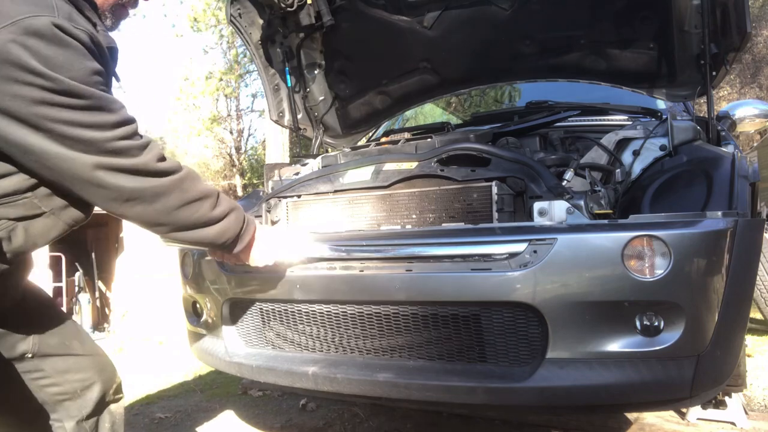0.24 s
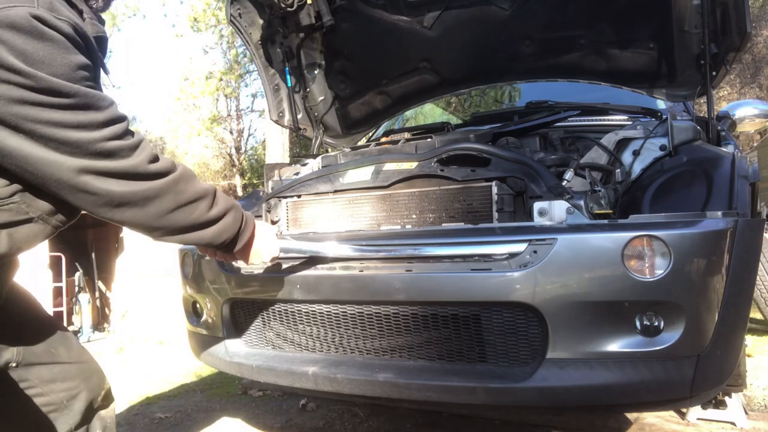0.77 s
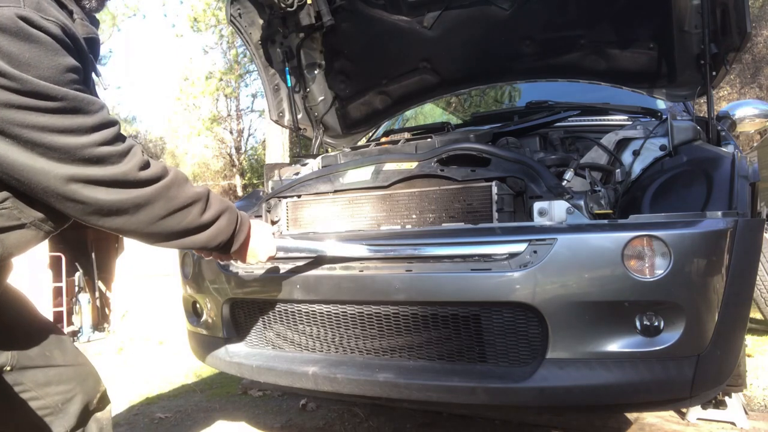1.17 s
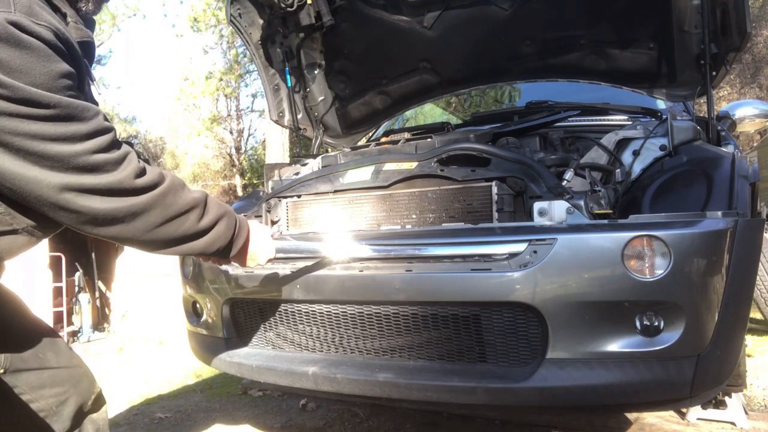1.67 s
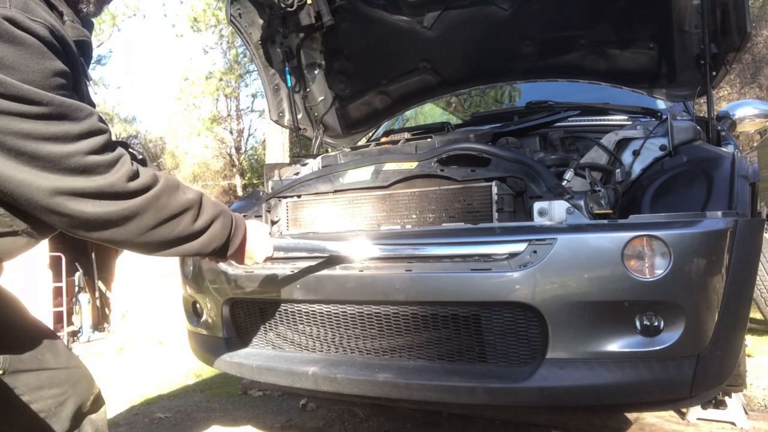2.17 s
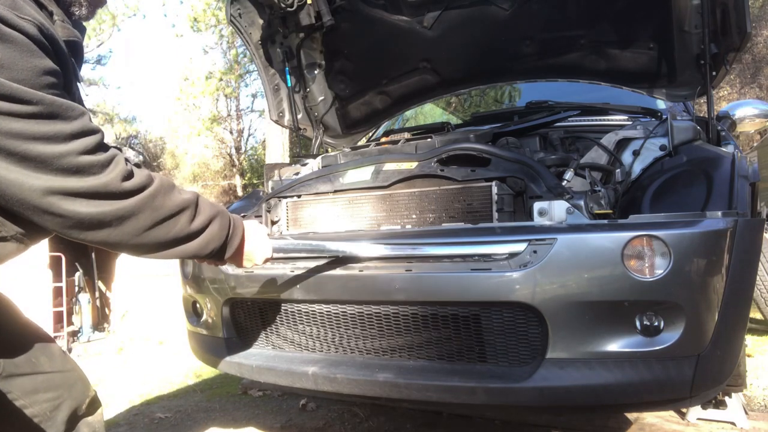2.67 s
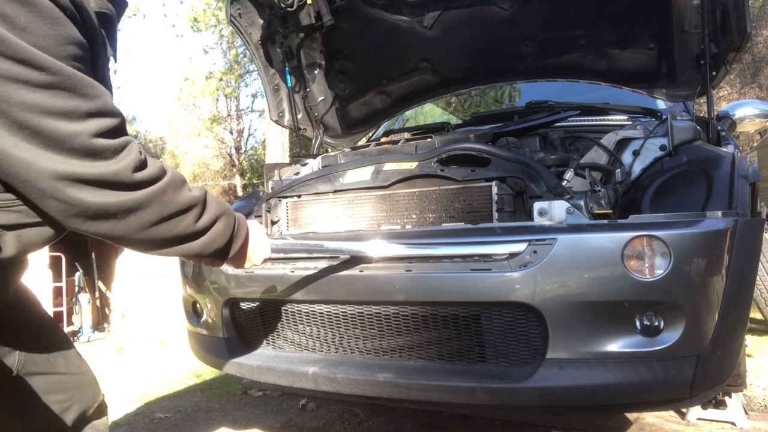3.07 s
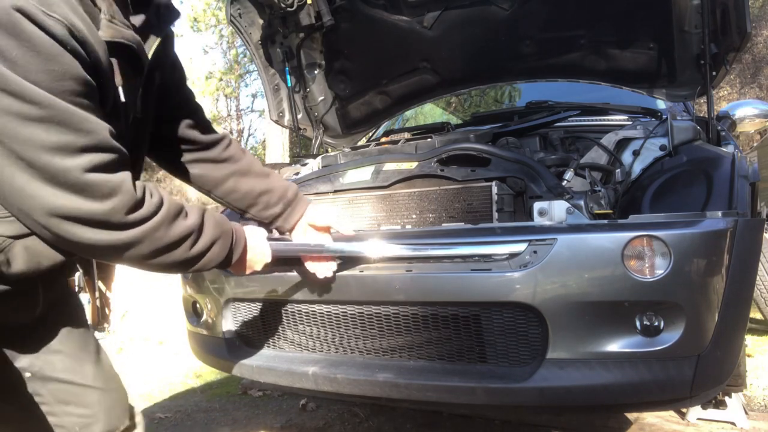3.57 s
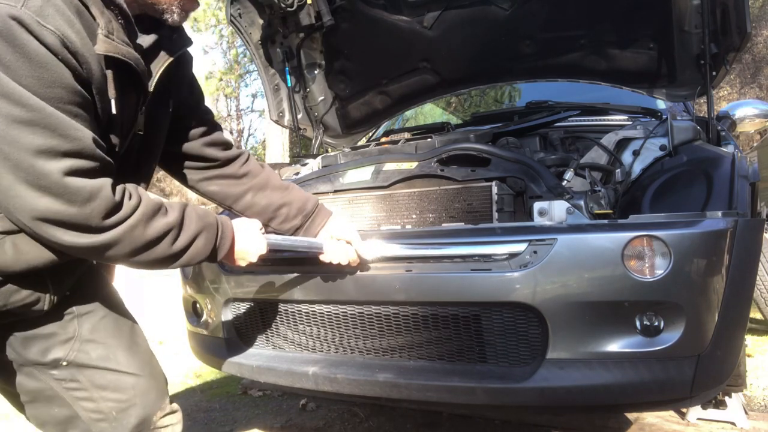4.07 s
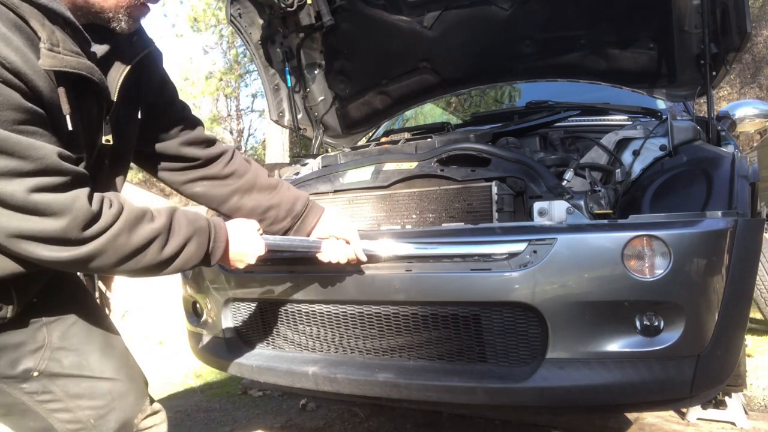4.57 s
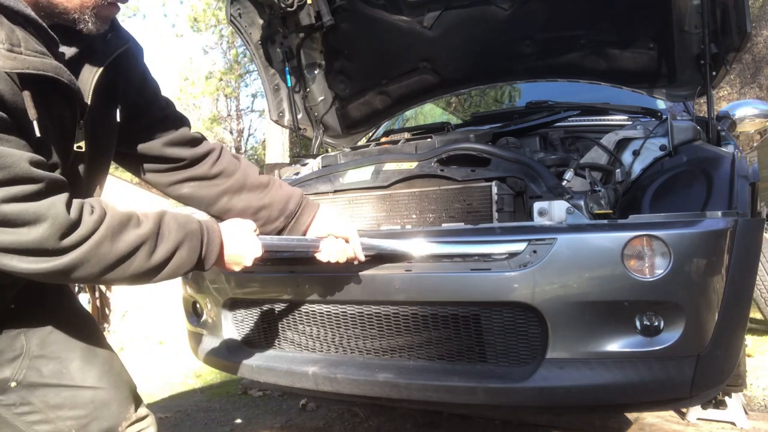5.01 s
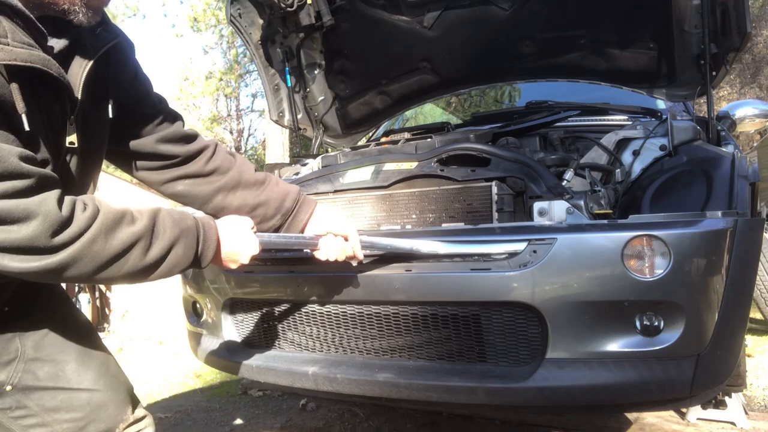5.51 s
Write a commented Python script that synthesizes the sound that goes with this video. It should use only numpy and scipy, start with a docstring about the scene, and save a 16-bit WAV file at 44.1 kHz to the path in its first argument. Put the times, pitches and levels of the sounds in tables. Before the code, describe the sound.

Close outdoors, plastic clips snap off a hollow car bumper, then a stick-slip squeal wanders in pitch before more snaps, creaks and ticks.

```python
"""A plastic trim strip is pulled off a car bumper by hand, outdoors and up close, as sleeves and hands rustle.
The first tug snaps clips free, which ring the hollow shell over a low thump and a loose rattle; then the strip
sticks and slips on the paint so quickly that its impulses fuse into a long, wandering squeal. More clips snap,
one with a squeak. Slower slips creak and the slowest tick singly, ringing the strip, while a second hand pats
the shell. Late snaps follow, and the strip, now lifted clear, creaks and ticks with a new set of modes."""
import sys
import numpy as np
from scipy import signal
from scipy.fft import rfft, irfft, next_fast_len
from scipy.io import wavfile
from scipy.ndimage import map_coordinates

SR = 44100
rng = np.random.default_rng(int(sys.argv[2]) if len(sys.argv) > 2 else 0)


def master_out(mix):
    """Clip the mix to full scale and print it as 16-bit PCM to the path in sys.argv[1]."""
    frames = np.transpose(np.atleast_2d(mix))
    ceiling = np.clip(frames, -1, 1)
    pcm = np.round(ceiling * 32767).astype(np.int16)
    wavfile.write(sys.argv[1], SR, pcm)


N = 253442
TIME = np.arange(N) / SR
TAIL = np.arange(SR // 2) / SR  # time axis of one ring, s

# Still outdoor air, spectrum points: [f/Hz, relative level/dB]
AIR_COLOUR = [(15, -44), (25, -15), (97, -4), (127, 0.5), (190, -6), (489, -21.5), (1440, -18), (3250, -17),
              (4030, -17), (16000, -30)]
# Rubbing cloth, spectrum points: [f/Hz, relative level/dB]
CLOTH_COLOUR = [(35, -58.5), (60, -18), (262, -1), (371, -4), (448, -2), (842, -4), (2300, -10.5),
                (3040, -7.5), (4120, -12), (5860, -11), (16000, -29.5)]
# Swells of rubbing cloth and loose rattle: sleeves, hands, and the bumper rattling after the first tug:
# [t/s at the peak, level/dB, rise/s, fall/s, treble/dB]
SWELLS = [(0.15, -47, 0.48, .6, -4), (0.328, -33, 0.041, 0.18, 1), (0.939, -57.5, 0.34, 0.36, 5),
          (2.849, -51, .4, 0.57, 3), (3.68, -44, 0.29, .35, -5.5), (4.779, -44.5, 0.97, 0.29, -5.5),
          (5.4, -59, .5, .3, 7.5)]
# Edges of the bands in which the shell fades: [f/Hz]
BAND_EDGES = [45, 150, 400, 1100, 2800, 6500, 17000]
# How long the shell holds before fading, per band, to be scaled by each sound: [t/s]
RING_TIME = [.022, 0.022, 0.0086, 0.005, 0.0024, 0.0025]
# Modes of the bumper shell: [f/Hz, width/Hz, level/dB]
BUMPER_MODES = [(243.4, 26, 17), (295, 100, 7), (453, 20, 7.5), (647, 75, 9), (890, 450, -1),
                (1215, 95, -2), (1770, 120, 1), (3770, 150, -0.5)]
# Modes of the strip lying against the paint: [f/Hz, width/Hz, level/dB]
SEATED_MODES = [(987, 190, -1), (1808, 65, 0.5), (2815, 200, -5), (3756, 167, 1), (4290, 370, 3),
                (6900, 770, -6.5), (8000, 300, -19)]
# Modes of the strip lifted clear: [f/Hz, width/Hz, level/dB]
LIFTED_MODES = [(232, 14, 0), (414, 44, -0.5), (695, 30, 4), (1233, 25, 0), (1817, 93, -3.5), (2452, 75, 4),
                (3810, 95, -3.5), (4170, 240, 1), (4685, 140, -4), (7800, 520, -10.5)]
# Creaks: [treble/dB, rows of [t/s, slip rate/Hz, relative level/dB]]
CREAKS = [ (6.5, [(1.982, 180, -42.5), (2.03, 930, -35), (2.052, 580, -42.5)]), (-14.5, [(2.86, 1200, -32),
          (2.878, 1170, -30.5), (2.91, 530, -41.5), (2.965, 130, -49), (3.041, 55, -47.5)]),
          (-5.5, [(3.11, 105, -40), (3.155, 92, -40.5)]), (-2, [(3.221, 160, -37.5), (3.26, 270, -37.5),
          (3.293, 130, -39)]), (6.5, [(3.645, 110, -46.5), (3.726, 58, -44)]), (-4, [(3.955, 130, -37),
          (4.035, 210, -39.5), (4.08, 510, -59)]), (-13, [(4.175, 240, -46.5), (4.205, 200, -37.5),
          (4.3, 210, -38.5), (4.435, 500, -36.5), (4.455, 200, -50.5)]), (-0.5, [(5.452, 900, -33),
          (5.485, 330, -27), (5.518, 130, -25), (5.583, 66, -27.5)])]
# Slips slow enough to tick one by one: [t/s]
SINGLE_SLIPS = [3.063, 3.084, 3.0991, 3.192, 3.2145, 3.852, 3.8759, 3.9224, 3.944, 5.602, 5.624, 5.651,
                5.678, 5.7065, 5.728]
# Squeal of strip on paint, slip rate before it wavers and hops: [t/s, f/Hz]
SQUEAL_RATE = [(1.034, 2100), (1.058, 1430), (1.146, 1400), (1.158, 925), (1.242, 895), (1.262, 1700),
               (1.3, 1810), (1.355, 2250), (1.42, 2100), (1.469, 3200), (1.495, 2280), (1.555, 1960),
               (1.594, 3100), (1.62, 4900), (1.664, 4600), (1.69, 1900), (1.751, 2450), (1.815, 1850),
               (1.86, 900), (1.917, 180)]
# How hard the strip rubs: [t/s, relative level/dB]
PRESSURE = [(1.034, -43), (1.046, -31.5), (1.294, -32), (1.422, -34.5), (1.58, -38), (1.704, -26.5),
            (1.714, -38.5), (1.766, -32), (1.816, -38.5), (1.836, -33), (1.902, -33), (1.917, -39)]
# Squeal and rasp, spectrum points: [f/Hz, relative level/dB]
SQUEAL_COLOUR = [(150, -28), (450, 3.5), (950, -7.5), (1700, -1), (2500, -7.5), (3600, 3.5), (7000, -1),
                 (10000, -8), (16000, -6.5)]
# Snaps of clips and knocks of the strip: [t/s, level/dB, bass/dB, treble/dB]
SNAPS = [(0.096, -49, -14, -8.5), (0.318, -24.5, 8.5, 5.5), (0.3332, -19.5, -5, -9),
         (0.4226, -19.5, 0, -0.5), (0.465, -20.5, -7, -20.5), (0.4777, -15, -7, -4), (1.963, -63.5, 0, 15),
         (2.054, -29, 12, 1.5), (2.355, -70, -0.5, 3.5), (2.5351, -25.5, 0.5, 2.5), (2.72, -45, 2.5, -1),
         (2.779, -15, 1.5, -8), (4.461, -37.5, -15, -12.5), (4.625, -20.5, 0.5, -2.5),
         (4.684, -34, 4.5, 13), (4.8692, -33, 1, 14), (5.087, -49.5, -2, 2), (5.365, -36.5, -3, 10),
         (5.4418, -30.5, 1.5, 15)]
# A second hand lands on the bumper and takes hold: [t/s, level/dB, bass/dB, treble/dB]
PATS = [(3.439, -50.5, 9.5, -1.5), (3.479, -51.5, 9, -2), (3.502, -48, -3.5, -1), (3.771, -41, -5, 0),
        (3.8, -47, -9, 6), (3.816, -39, -5.5, 2)]
# What all snaps share, one row per band: [level/dB, share of the bass, share of the treble]
SNAP_BANDS = [(-28, 0.66, 0), (-10, 0.96, 0), (0, 0.015, 0), (-0.63, 0.074, 0.21), (1.5, 0.044, 0.85),
              (-7, 0.36, 1)]
# A soft contact, per band: [relative level/dB]
PAT_BANDS = [-1, 1.5, 2, 0, -2, -4]

SWELL_DROP_DB, HOLD_DB = 22, -73.5  # a swell's drop over its rise or fall; rustle of hands holding still
THUMP_DELAY_S = 0.012  # the bumper flexes back just after the first tug
SQUEAK_S, SQUEAK_HZ, SQUEAK_DB = 2.551, 7520, -23  # start, centre pitch, level
SQUEAK_ATTACK_S, SQUEAK_HOLD_S, SQUEAK_T60_S = 0.004, 0.027, 0.038  # hold counts from the start
LIFT_TIME_S, LIFT_GAIN_DB = 5.0, 5.5  # the strip comes clear; its single slips gain this much
SLIP_DB, SLIP_DB_PER_S = -40.5, 4.5  # drive of the first tick; growth as the strip bends further
ROUGHNESS, ROUGH_GROWS = 0.071, 1.4  # base at mean pressure; dB of roughness per dB of pressure
WARBLE, WARBLE_AT_HZ = 0.022, 2015  # waver depth as a share of pitch at this slip rate; deeper when faster
HOP, HOPS_PER_S = 0.035, 45  # typical hop as a share of pitch at the same slip rate; mean hop count
SNAP_HOLD, BRIGHT_SHORTENS = 1.32, 0.1  # ring-time factor; dB of it lost per dB of treble over the middle band
TOP_HZ = 16000  # band limit


def amp(db):
    """Decibels to gain."""
    return 10 ** (np.asarray(db) / 20)


def unit(x):
    """Scaled to rms 1."""
    return x / np.sqrt(np.mean(x ** 2) + 1e-20)


def per_blow(x):
    """Scaled to the energy of 10 ms at rms 1."""
    return x * np.sqrt(SR / 100 / (np.sum(x ** 2) + 1e-20))


def colour(points, hz):
    """Gain of spectrum points, joined on a log frequency axis."""
    f, db = np.transpose(points)
    return amp(np.interp(np.log(hz + 1), np.log(f + 1), db))


def filtered(x, response):
    """x shaped by a response of frequency, zero-padded against wrap-around."""
    m = next_fast_len(len(x) + 8192)
    spectrum = rfft(x, m) * response(np.fft.rfftfreq(m, 1 / SR))
    return irfft(spectrum, m)[:len(x)]


def split(x, hz):
    """The parts of x below and above a frequency, on a gentle slope."""
    low = signal.sosfilt(signal.butter(1, min(hz, SR / 4), fs=SR, output='sos'), x)
    return low, x - low


def wobble(rate):
    """A smooth random curve, rate knots a second."""
    knots = rng.standard_normal(int(N * rate / SR) + 4)
    return map_coordinates(knots, [TIME * rate])


def curves(rows):
    """One value per sample for each column after the time."""
    s, *cols = np.transpose(rows)
    return [np.interp(TIME, s, c) for c in cols]


def pulses(times, sizes):
    """Band-limited impulses (windowed sincs) at times between samples."""
    at = np.asarray(times) * SR
    index = np.floor(at).astype(int)[:, None] + np.arange(-7, 9)
    offset = index - at[:, None]
    shape = np.sinc(offset) * np.sinc(offset / 8)
    weights = shape * np.asarray(sizes)[:, None]
    return np.bincount(np.clip(index, 0, N).ravel(), weights.ravel(), N + 1)[:N]


def resonances(modes, hz):
    """Causal response of a set of damped modes."""
    return sum(amp(db) * 1j * hz * w / (c * c - hz * hz + 1j * hz * w) for c, w, db in modes)


def shell_ring(band_db, hold, fade, rise, dull_hz=12500):
    """Crowded plastic modes: unequal damping makes a power-law decay, and the bass builds and fades slowest."""
    def shell(hz):
        return (1 + resonances(BUMPER_MODES, hz)) / np.sqrt(1 + (hz / dull_hz) ** 4)

    noise = filtered(rng.standard_normal(len(TAIL)), shell)
    out = np.zeros(len(TAIL))
    for lo, hi, db, life in zip(BAND_EDGES, BAND_EDGES[1:], band_db, RING_TIME):
        age = TAIL / (life * hold)
        band = filtered(noise, lambda hz: 1 / (1 + (lo / (hz + 1)) ** 8 + (hz / hi) ** 8))
        envelope = (1 - np.exp(-age / rise)) * (1 + age) ** -fade
        out += amp(db) * per_blow(band * envelope)
    return out * (1 - TAIL / TAIL[-1])


def stick_slip(rate, db, rough, span, scatter_db):
    """One impulse per slip, the last ending the span; roughness scatters them and limps every second one."""
    inside = (TIME >= span[0]) & (TIME <= span[1])
    turns = np.cumsum(rate[inside]) / SR
    times = np.interp(np.arange(turns[-1] % 1, turns[-1] + .5), turns, TIME[inside])
    rate, db, rough = (np.interp(times, TIME, c) for c in (rate, db, rough + 0 * TIME))
    late, strong = rng.standard_normal((len(times), 2)).T
    limp = (-1) ** np.arange(len(times))
    slip_times = times + rough * (late + limp) / rate
    # dividing by the root of the rate keeps the power steady as slips crowd
    sizes = amp(db + scatter_db * rough * (strong + limp)) / np.sqrt(rate)
    return pulses(slip_times, sizes)


def outdoor_air():
    """Still air: steady noise, heaviest in the bass."""
    return amp(-69.5) * unit(filtered(rng.standard_normal(N), lambda hz: colour(AIR_COLOUR, hz)))


def rustle(count=260):
    """Swells of rubbing cloth and loose rattle: shaped noise with tiny ticks of plastic."""
    cloth = unit(filtered(rng.standard_normal(N), lambda hz: colour(CLOTH_COLOUR, hz)))
    times = rng.uniform(0, TIME[-1], count)
    ticks = pulses(times, amp(6.5 * np.clip(rng.standard_normal(count), -2, 2)))
    tick_ring = shell_ring([-32.5, -17, -16.0, -1, 0, -1], hold=0.93, fade=2.1, rise=0.34)
    plastic = signal.fftconvolve(ticks, tick_ring)[:N]
    low, high = split(amp(-0.5 + 0.8 * wobble(35)) * cloth + amp(-8.5) * plastic, 1500)
    out = amp(HOLD_DB) * cloth
    for s, db, rise, fall, treble_db in SWELLS:
        swell = amp(-SWELL_DROP_DB * np.maximum((s - TIME) / rise, (TIME - s) / fall))
        # a weaker swell is duller
        out += amp(db) * swell * (low + amp(treble_db) * swell ** .15 * high)
    return out


def thump(hz=68, db=-6.0, swell=0.004):
    """The first tug flexes the whole bumper: one low, quickly damped push."""
    age = np.maximum(TIME - SNAPS[1][0] - THUMP_DELAY_S, 0)
    envelope = (age / swell) * np.exp(-age / swell)
    return amp(db) * envelope * np.sin(2 * np.pi * hz * age)


def squeak():
    """A clip leaving its hole whistles thinly, with its octave and a little rasp."""
    age = TIME - SQUEAK_S
    attack = np.clip(age / SQUEAK_ATTACK_S, 0, 1)
    release_db = -60 * np.maximum(age - SQUEAK_HOLD_S, 0) / SQUEAK_T60_S
    level = attack * amp(SQUEAK_DB + release_db) * amp(2.5 * wobble(200))
    pitch = SQUEAK_HZ * (1 + 0.016 * wobble(130) + 0.0036 * wobble(600))
    phase = 2 * np.pi * np.cumsum(pitch) / SR
    rasp = unit(filtered(rng.standard_normal(N), lambda f: colour(SQUEAL_COLOUR, f)))
    return level * (np.sqrt(2) * np.sin(phase) + amp(-14) * np.sin(2 * phase) + amp(-15.5) * rasp)


def strip_ring(modes, shell_db):
    """The answer to one slip: a sharp tick, its bounce off the bumper, the strip's modes and the shell."""
    impulse = 1.0 * (np.arange(len(TAIL)) == 0)
    ring = per_blow(filtered(impulse, lambda hz: resonances(modes, hz)))
    tick_band = signal.butter(2, [2300, 5600], 'band', fs=SR, output='sos')
    tick = per_blow(signal.sosfilt(tick_band, impulse))
    bounce = np.pad(tick, (round(0.0027 * SR), 0))[:len(TAIL)]
    shell = shell_ring(shell_db, hold=1.44, fade=2.2, rise=0.32)
    return amp(-1) * split(ring, 15000)[0] - amp(-12.0) * tick + amp(-12) * bounce + shell


def creaks():
    """Every slip rings the strip, in quick runs or one by one; lifting it clear changes its modes."""
    drive = np.zeros(N)
    for treble_db, rows in CREAKS:
        rate, db = curves(rows)
        span = rows[0][0], rows[-1][0]
        train = stick_slip(rate * (1 + .015 * wobble(90)), db + 20.0, 0.019, span, scatter_db=45.0)
        drive += train + (amp(treble_db) - 1) * split(train, 5900)[1]
    s = np.array(SINGLE_SLIPS)
    db = SLIP_DB + SLIP_DB_PER_S * (s - s[0]) + LIFT_GAIN_DB * (s >= LIFT_TIME_S)
    # single slips are as bright as the creaks around them
    treble_db = np.interp(s, [rows[0][0] for _, rows in CREAKS], [treble for treble, _ in CREAKS])
    drive += pulses(s, amp(db)) + split(pulses(s, amp(db) * (amp(treble_db) - 1)), 7000)[1]
    seated_ring = strip_ring(SEATED_MODES, [-31, -19.0, -11, -8.0, -8, -16])
    lifted_ring = strip_ring(LIFTED_MODES, [-65, -21.0, -8.5, -8, -9.5, -14.5])
    seated = signal.fftconvolve(drive * (TIME < LIFT_TIME_S), seated_ring)
    lifted = signal.fftconvolve(drive * (TIME >= LIFT_TIME_S), lifted_ring)
    return (seated + lifted)[:N]


def squeal():
    """Slips so quick that they fuse into a wandering pitch; more pressure makes it louder and more rasping."""
    rate, = curves(SQUEAL_RATE)
    db, = curves(PRESSURE)
    span = SQUEAL_RATE[0][0], SQUEAL_RATE[-1][0]
    mean_db = np.mean(PRESSURE, axis=0)[1]
    rough = np.minimum(ROUGHNESS * amp(ROUGH_GROWS * (db - mean_db)), .17)
    waver = WARBLE * (rate / WARBLE_AT_HZ) ** 1.2 * wobble(90)
    rate = rate * np.exp(waver + 0.14 * rough * wobble(900))
    # fast slipping loses its grip and hops in pitch, holding each hop until the next
    hops = rng.standard_normal(N)[np.cumsum(rng.random(N) < HOPS_PER_S / SR)]
    rate = rate * np.exp(HOP * hops * rate / WARBLE_AT_HZ)
    train = stick_slip(rate, 0 * db, 0.16 * rough, span, scatter_db=46.5)
    # a second point of contact slips at its own, straying rate
    stray_rate = rate * np.exp(0.14 * wobble(35))
    train += amp(-7.5) * stick_slip(stray_rate, 0 * db, 0.21 * rough, span, scatter_db=38.5)
    body = rng.standard_normal(len(TAIL)) * (1 + TAIL / 0.0045) ** -1.7
    body = body / np.linalg.norm(body)
    body[0] += .7  # the direct sound leads the shell's answer
    rubbed = signal.fftconvolve(train * amp(db), body)[:N]
    tone = filtered(rubbed, lambda f: colour(SQUEAL_COLOUR, f) * (1 + 0.66 * resonances(BUMPER_MODES, f)))
    return amp(-41.5) * unit(tone)


def snaps():
    """Each released clip cracks and rings the shell, which radiates little deep bass; a hand pats it softly."""
    out = np.zeros(N + SR)
    blows = [(s, db + np.dot(SNAP_BANDS, [1, bass, treble])) for s, db, bass, treble in SNAPS]
    for s, db, bass, treble in PATS:
        blows.append((s, db + np.array(PAT_BANDS) + np.dot(SNAP_BANDS, [0, bass, treble])))
    for s, band_db in blows:
        # blows with more treble than middle are drier
        hold = SNAP_HOLD * amp(-BRIGHT_SHORTENS * (band_db[-2] - band_db[2]))
        out[round(s * SR):][:len(TAIL)] += shell_ring(band_db, hold, fade=2.04, rise=0.13)
    return signal.sosfilt(signal.butter(2, 55, 'high', fs=SR, output='sos'), out[:N])


def scene():
    """All sources over the still outdoor air."""
    return (outdoor_air() + rustle() + thump() + squeak() + creaks() + squeal() + snaps())[None]


def record(dry):
    """The recorder clips at full scale and keeps nothing above its band limit."""
    return np.array([filtered(np.clip(dry[0], -1, 1), lambda hz: hz < TOP_HZ)])


dry = scene()
out = record(dry)
master_out(out)
```